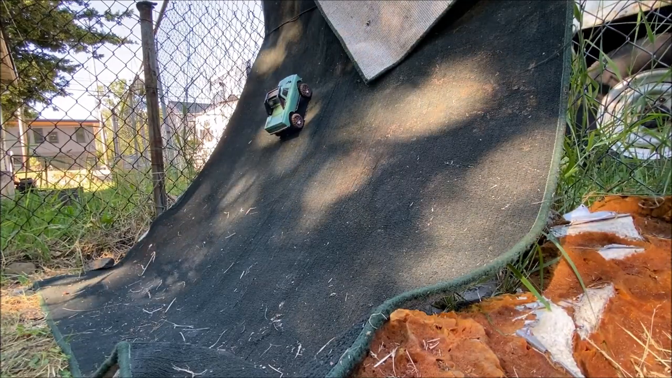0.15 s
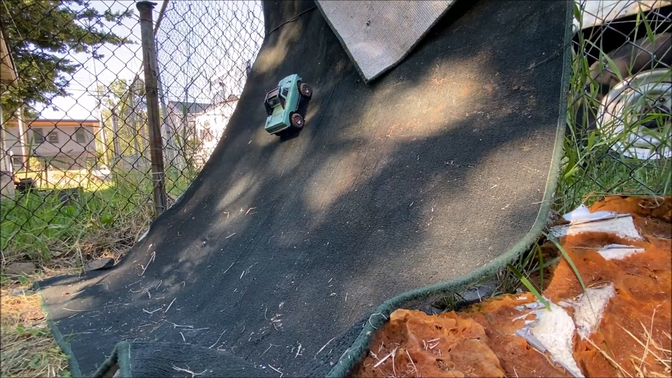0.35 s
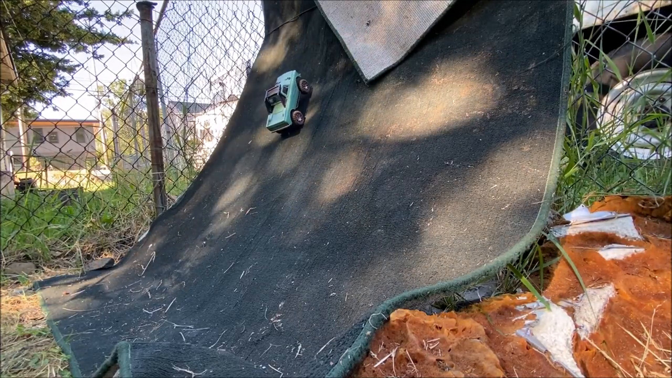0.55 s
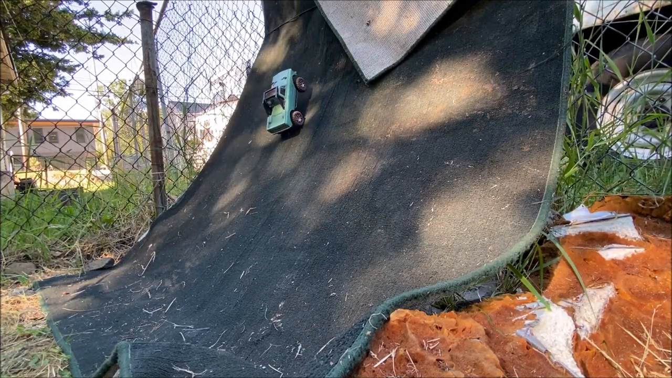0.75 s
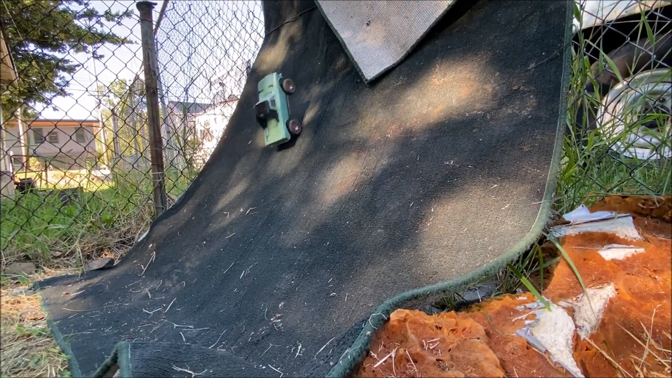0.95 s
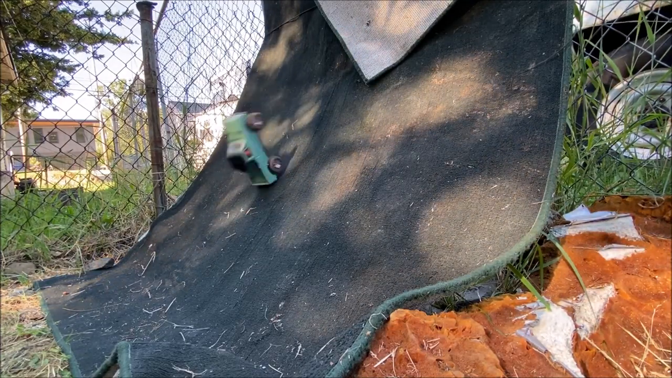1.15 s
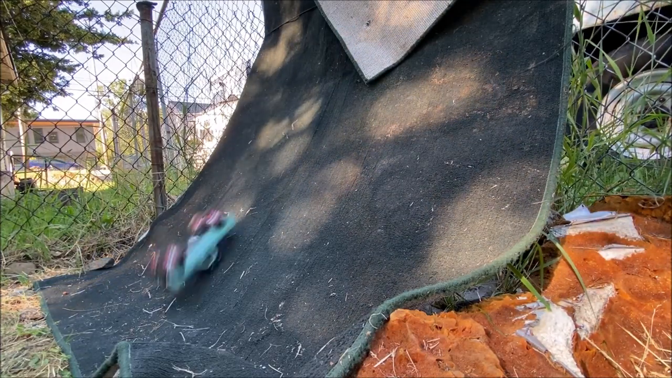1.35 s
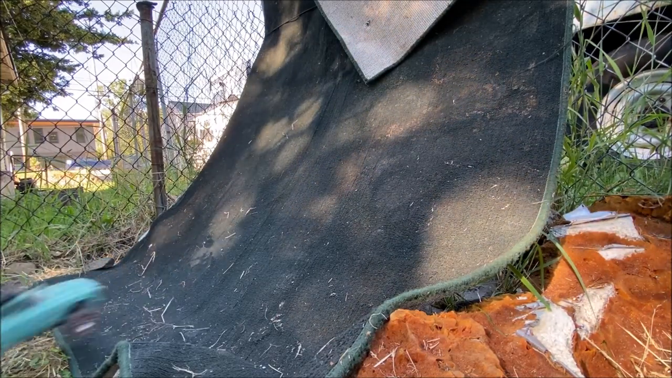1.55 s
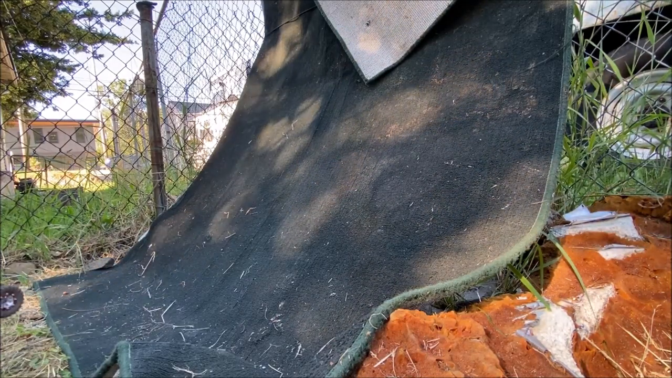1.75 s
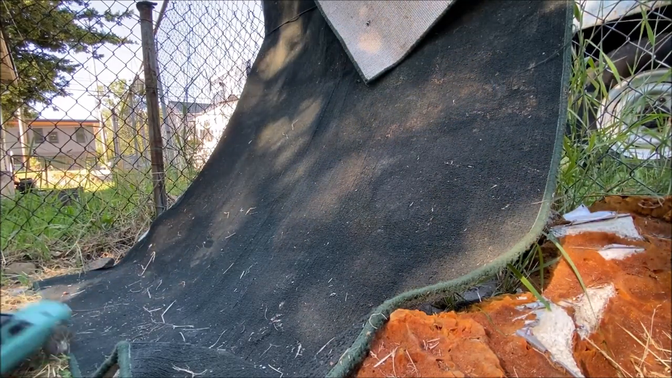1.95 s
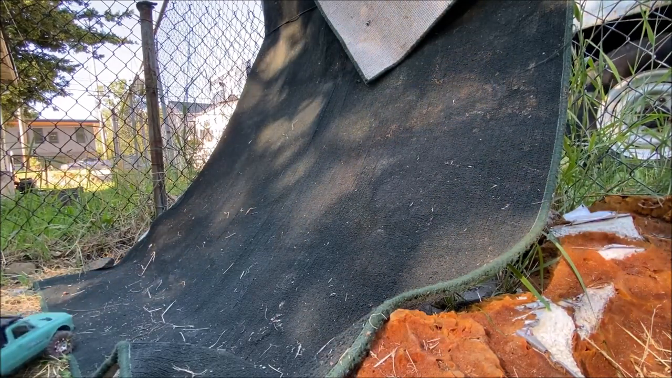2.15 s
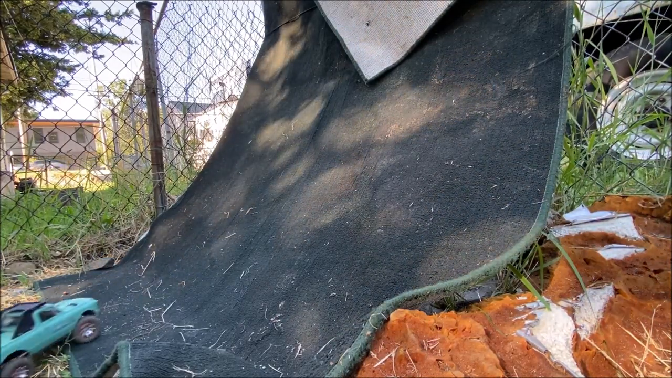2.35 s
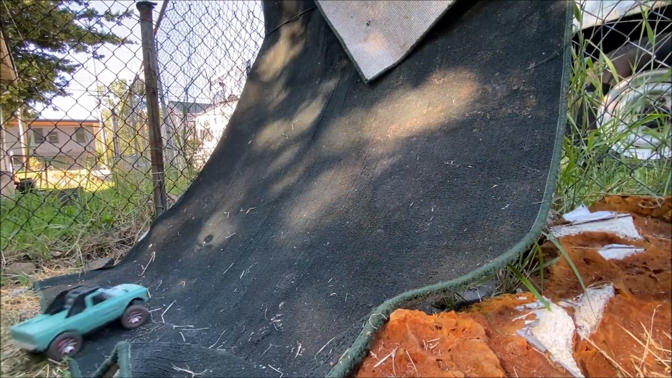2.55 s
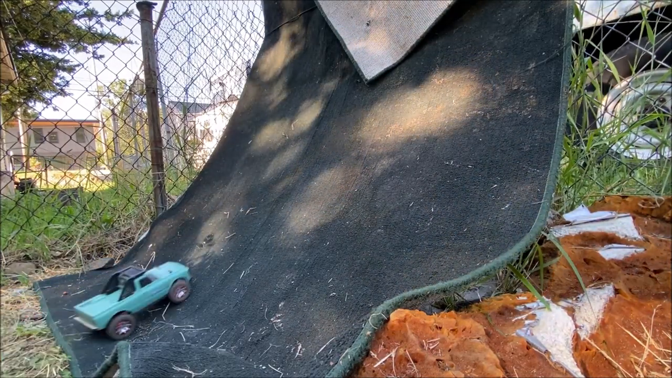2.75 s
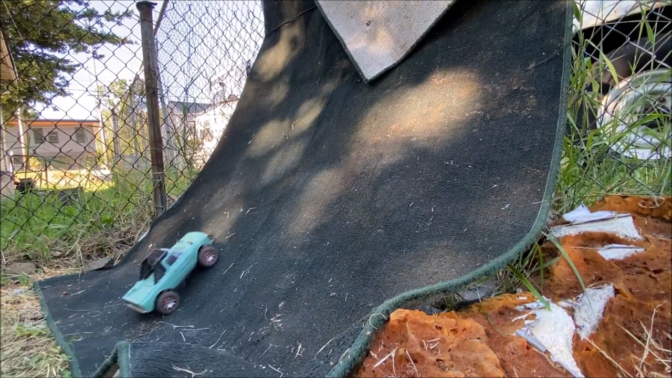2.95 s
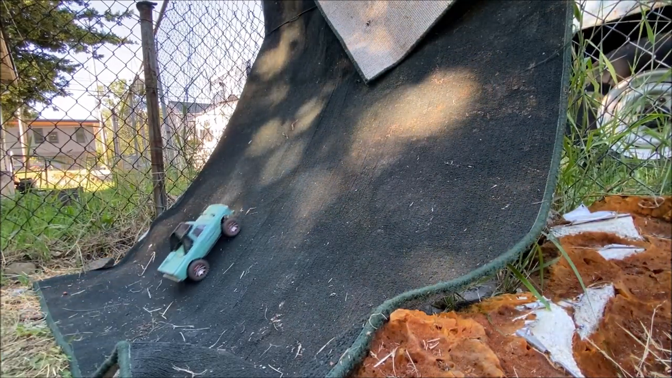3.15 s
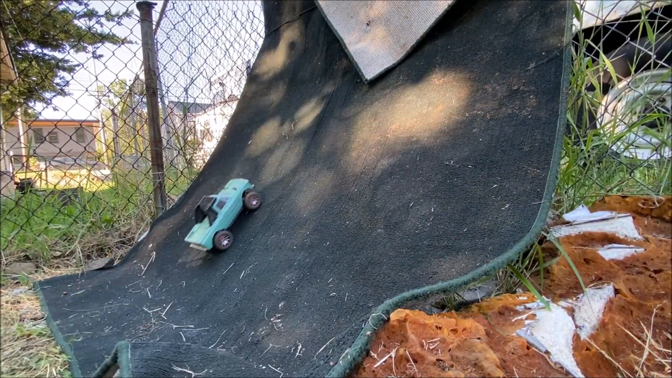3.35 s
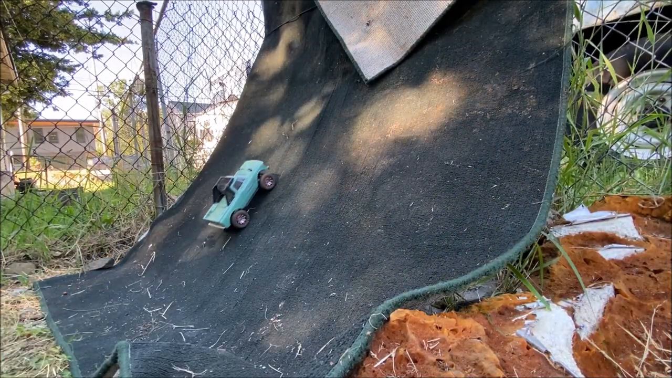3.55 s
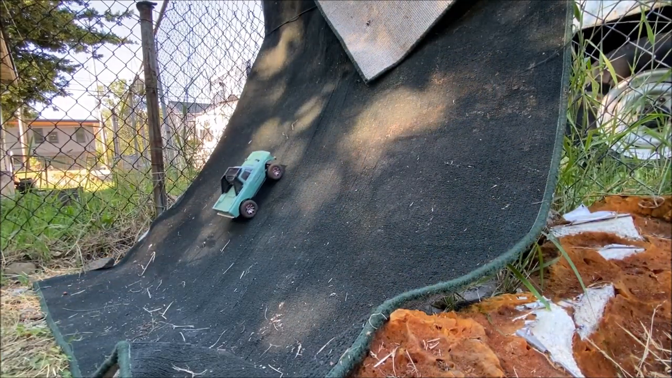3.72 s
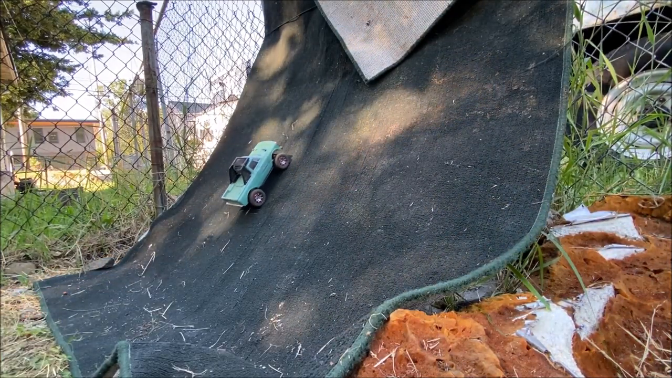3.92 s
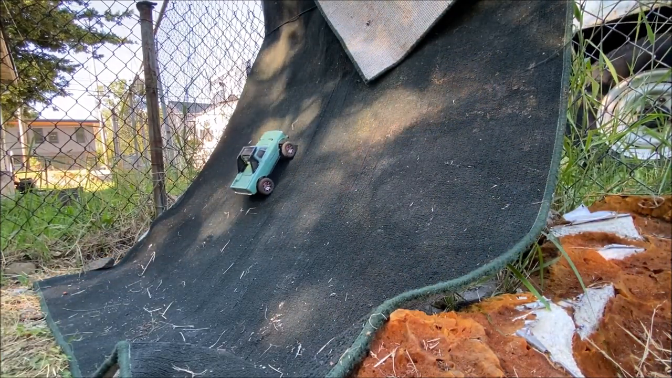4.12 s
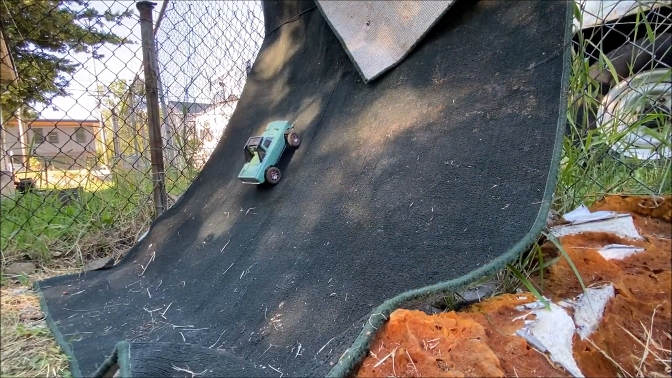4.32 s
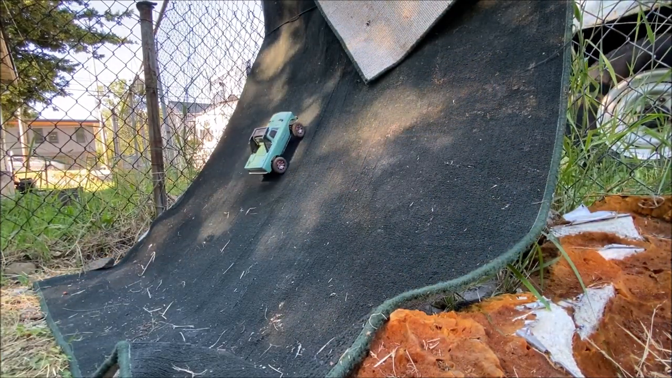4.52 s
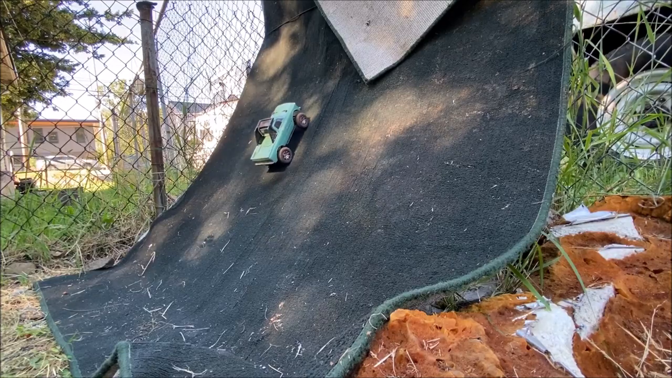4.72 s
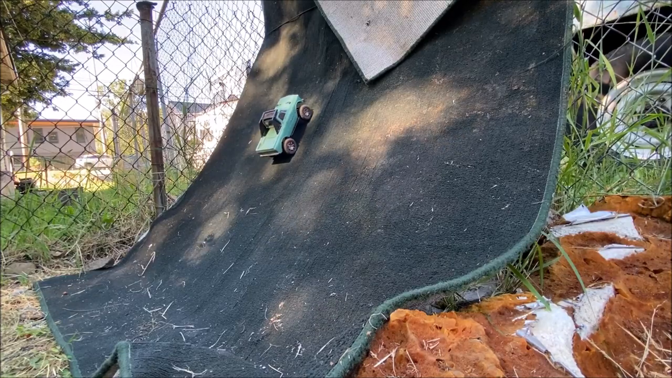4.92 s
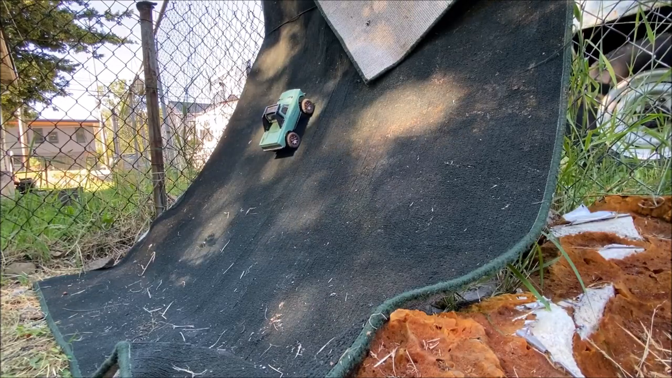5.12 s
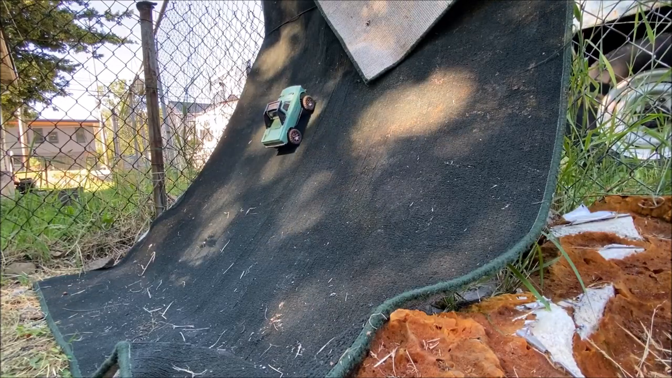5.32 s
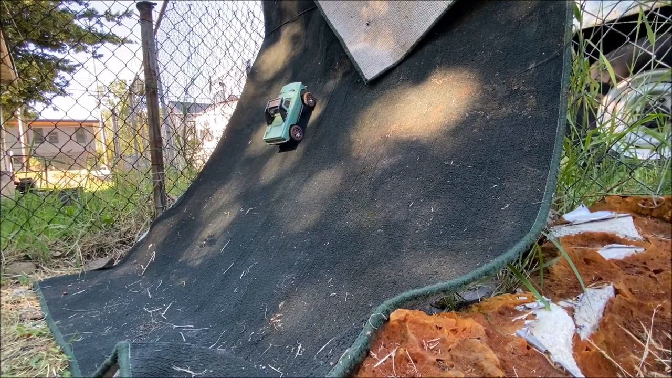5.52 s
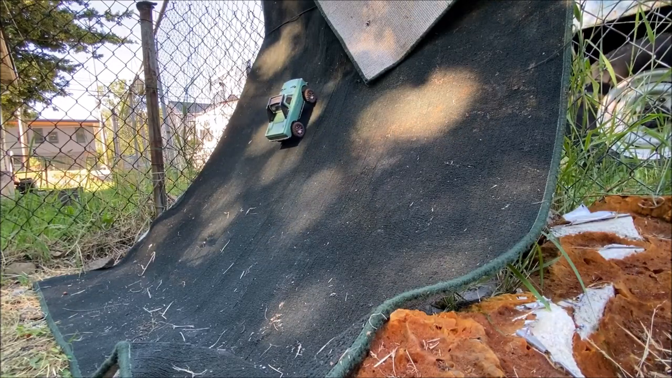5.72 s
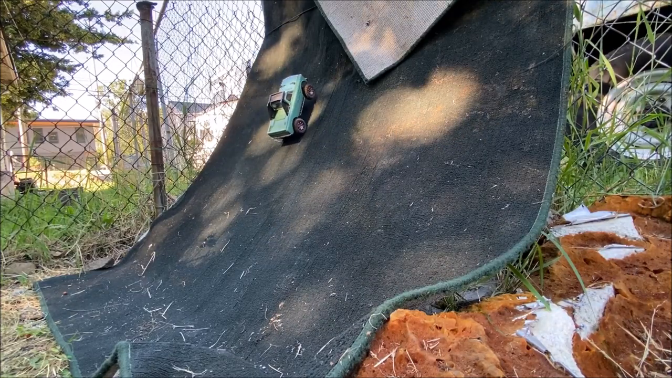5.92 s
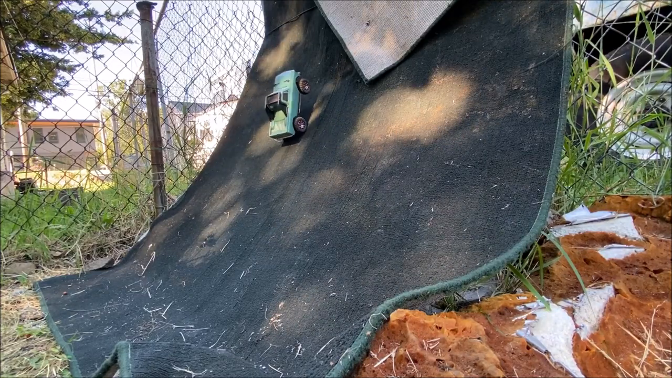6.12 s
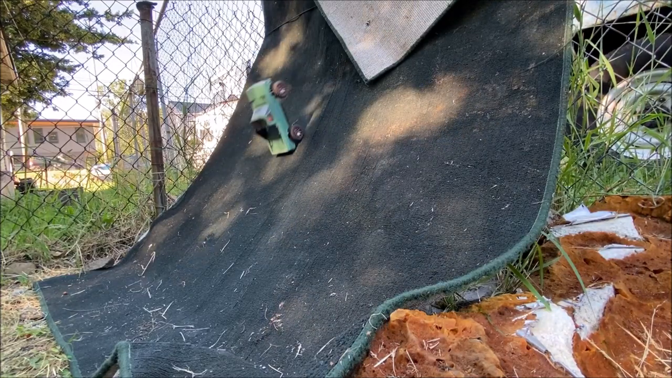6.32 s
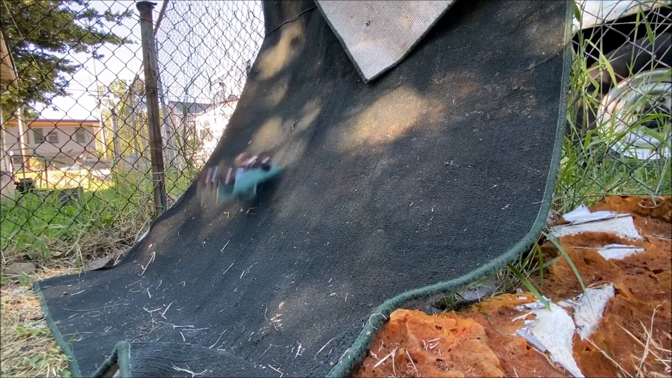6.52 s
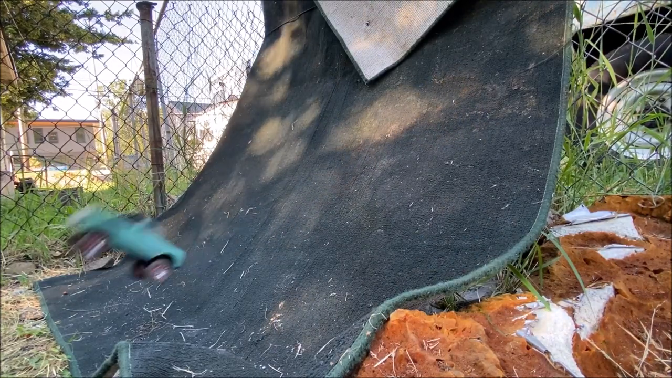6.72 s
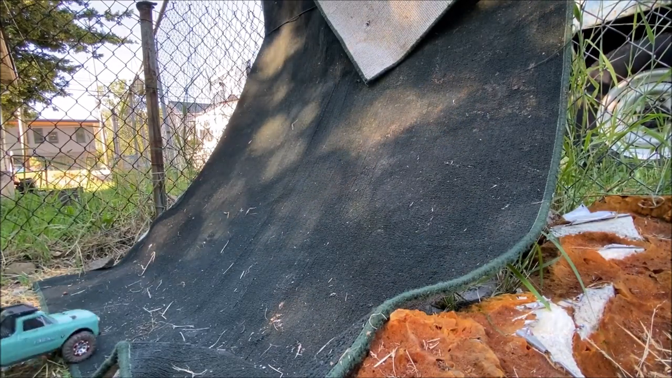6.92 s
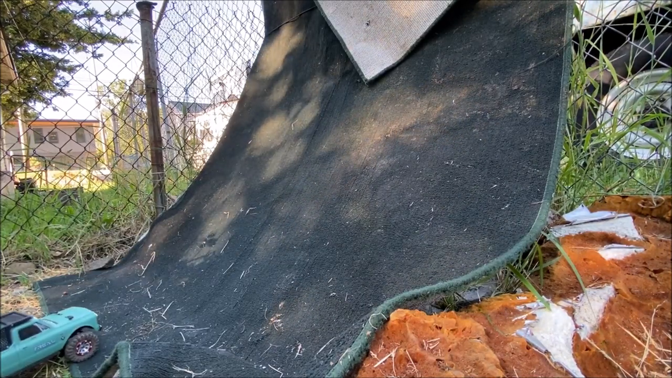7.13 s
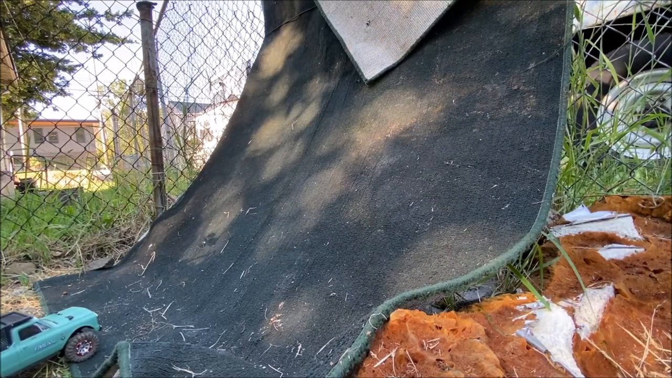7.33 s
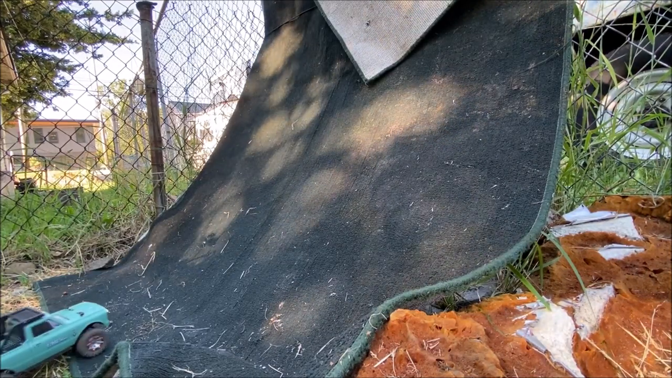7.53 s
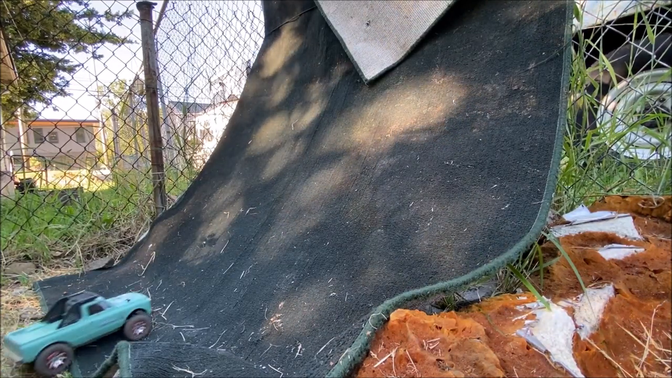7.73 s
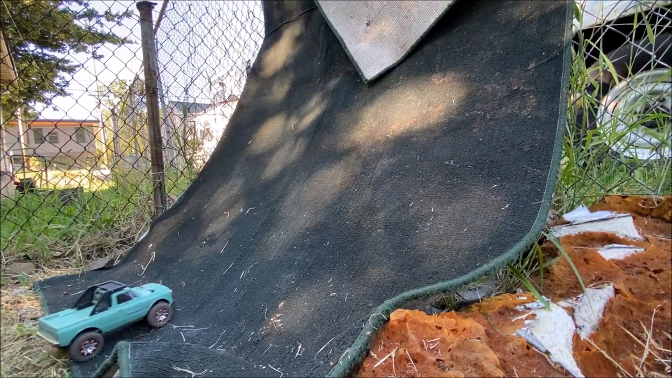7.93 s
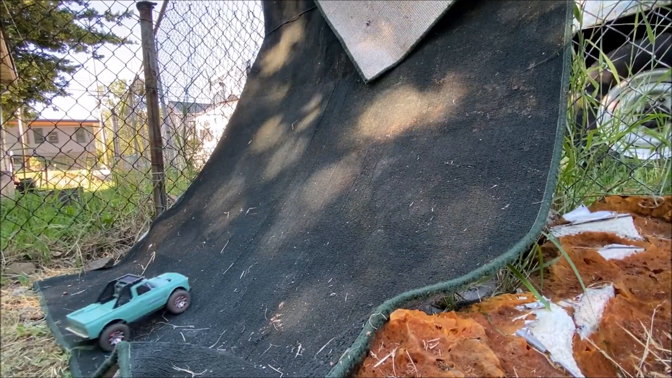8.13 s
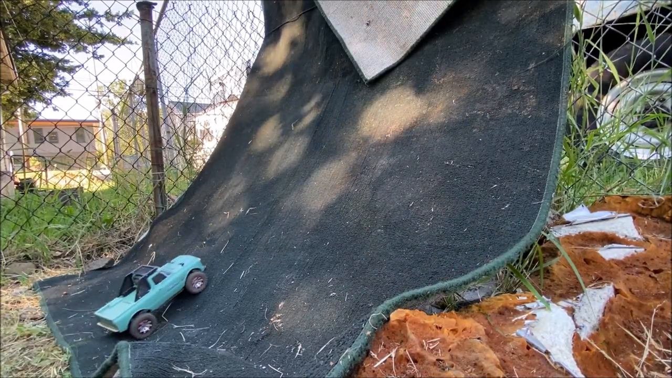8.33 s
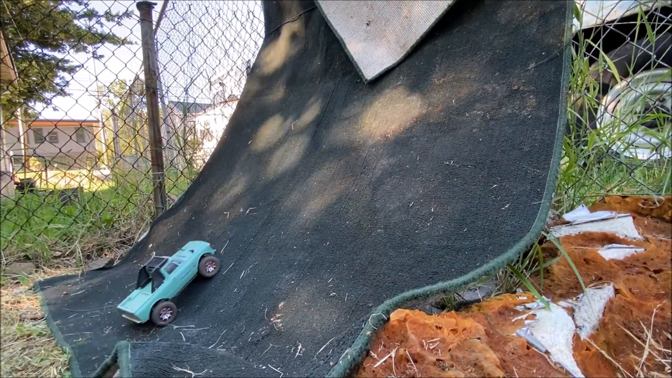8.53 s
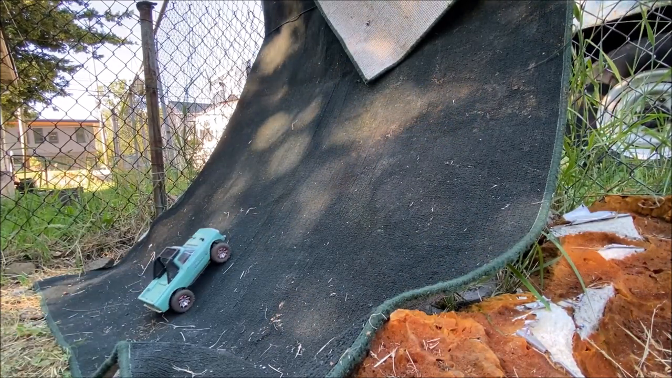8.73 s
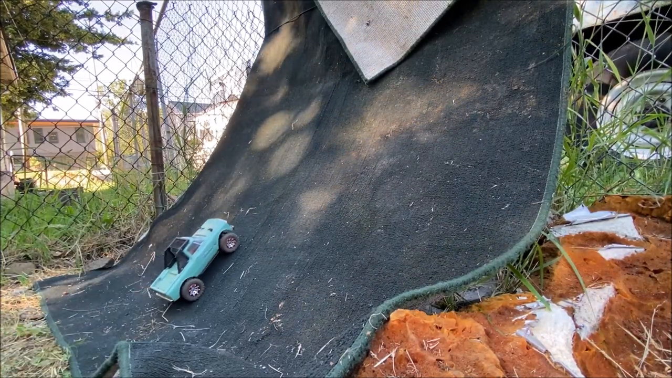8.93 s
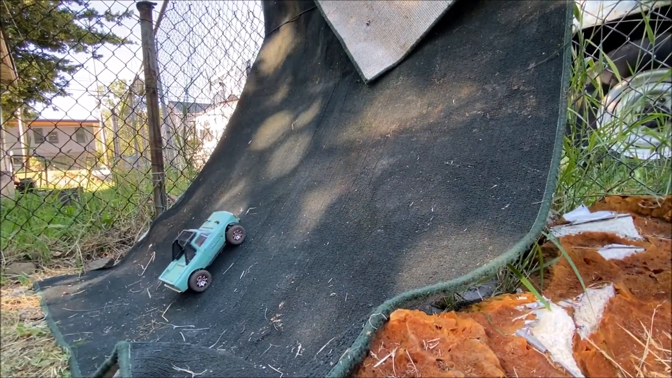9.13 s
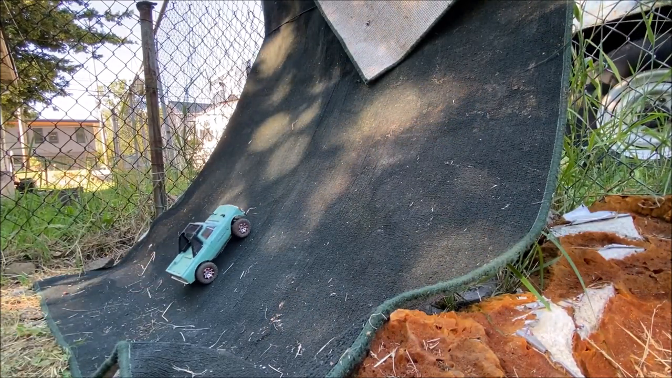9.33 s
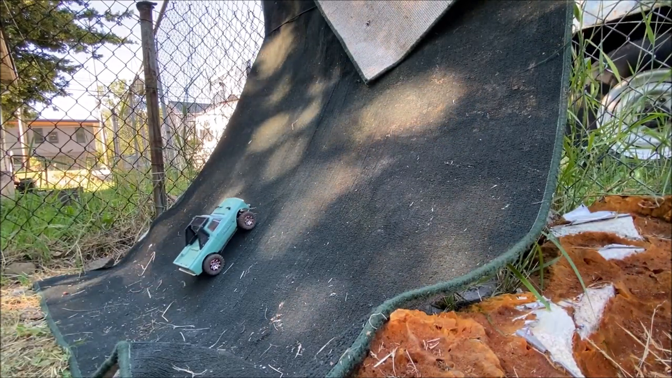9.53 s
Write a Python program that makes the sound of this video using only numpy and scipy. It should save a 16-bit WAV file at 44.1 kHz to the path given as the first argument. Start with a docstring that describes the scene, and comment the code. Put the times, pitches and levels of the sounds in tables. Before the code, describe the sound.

Soft distant traffic rumbles outdoors. A toy truck's tyres scuff, then it tumbles down a ramp in sharp plastic clacks and a short low boom. Its small geared motor spins up into a bright whine with gritty rattle, slows and fades on the climb. It falls again with hard cracks, then drives up once more. Close stereo phone microphones, truck mostly to the left.

```python
"""Distant traffic rumbles behind a garden; then a small electric toy truck squeals, scuffs and tumbles on its ramp.
Shell and wheels crack and chatter as noise bursts and ringing chassis modes; ramp modes boom on landing.
Its geared motor whines and rattles up the rubber-covered ramp, then it tumbles and climbs again:
tooth-mesh tones and a rasp repeating with the shaft follow the motor speed, with squeals as it labours.
Two spaced phone microphones hear the truck from the left."""
import sys
import numpy as np
from scipy import signal
from scipy.fft import rfft, irfft, next_fast_len
from scipy.io import wavfile

SR = 44100
rng = np.random.default_rng(int(sys.argv[2]) if len(sys.argv) > 2 else 0)


def dump(signal):
    """Clip the signal to [-1, 1] and save it as 16-bit WAV at the path in sys.argv[1]."""
    limited = np.clip(np.atleast_2d(signal).T, -1, 1)
    pcm = np.round(limited * 32767).astype(np.int16)
    wavfile.write(sys.argv[1], SR, pcm)


N = 422037
T = np.arange(N) / SR
SIZE = 2 * next_fast_len(N // 2 + 4096)  # padded transform length, samples
FREQ = np.fft.rfftfreq(SIZE, 1 / SR)


def undb(db):
    """Decibels to gain."""
    return 10 ** (np.asarray(db) / 20)


def unit(x):
    """Scale to rms 1."""
    return x / np.sqrt(np.mean(x ** 2))


def noise():
    """White noise."""
    return rng.standard_normal(N)


def curve(rows, axis=1):
    """One column of a timed table at every sample."""
    rows = np.array(rows)
    return np.interp(T, rows[:, 0], rows[:, axis])


def across(points):
    """Value at every transform frequency, joined on a log-frequency axis."""
    hz, value = np.transpose(points)
    return np.interp(np.log(FREQ + 1), np.log(np.abs(hz) + 1), value)


def shape(x, response):
    """Filter by a frequency response."""
    return irfft(rfft(x, SIZE) * response, SIZE)[:N]


def resonance(hz, width):
    """Response of one resonance, gain 1 at its centre."""
    return 1j * FREQ * width / (hz ** 2 - FREQ ** 2 + 1j * FREQ * width)


def body(peaks):
    """Joint gain of several resonances, their powers added."""
    power = sum(np.abs(undb(db) * resonance(hz, width)) ** 2 for hz, width, db in peaks)
    return np.sqrt(power)


def walk(rate):
    """Smooth random wander of rms 1, through two new random levels per cycle of rate [Hz]."""
    levels = rng.standard_normal(16384)
    place = T * rate * 2
    step = place.astype(int)
    blend = (1 - np.cos(np.pi * (place - step))) / 2
    here, following = levels[step % len(levels)], levels[(step + 1) % len(levels)]
    return unit(here * (1 - blend) + following * blend)


def spell(start, end, attack, t60, growth_db=0):
    """Envelope: attack ending at the start, drift by growth_db up to full level at the end, then a release."""
    onset = np.clip(1 + (T - start) / attack, 0, 1)
    to_go = np.clip((end - T) / (end - start), 0, 1)
    release_db = -60 * np.maximum(T - end, 0) / t60
    return onset * undb(-growth_db * to_go + release_db)


def ring(modes, length, scatter):
    """Decaying modes; each blow finds them with its own weights and slightly shifted."""
    hz, db, t60 = np.transpose(modes)[:, :, None]
    t = np.arange(length) / SR
    shift, weight = rng.standard_normal((2, len(modes), 1))
    # the lowest modes all move with the blow; higher ones radiate with either sign
    sign = np.where(hz < 300, 1, rng.choice([-1, 1], hz.shape))
    decay = undb(db + 2 * weight - 60 * t / t60)
    return np.sum(sign * decay * np.sin(2 * np.pi * hz * (1 + scatter * shift) * t), axis=0)


def add(track, s, sound):
    """Mix a sound in at time s."""
    start = int(s * SR)
    track[start:start + len(sound)] += sound[:N - start]


# receding traffic, before trims: (time [s], rumble level [dB], tyre wash level [dB])
TRAFFIC_LEVELS = [(0, -43, -48.5), (3, -43.5, -48), (6.5, -44.5, -49.5), (9.57, -47.5, -51)]
# tone of the low rumble: (frequency [Hz], relative level [dB])
RUMBLE_TONE = [(20, -41), (32, -19), (41, -14), (48, -5.5), (66, -5.5), (90, -4), (130, -3), (170, -4.5),
               (230, -7), (290, -12), (450, -22), (700, -22), (1200, -63), (2600, -100)]
# tone of the tyre wash: (frequency [Hz], relative level [dB])
WASH_TONE = [(200, -17), (370, -3.5), (460, -6), (600, -0.5), (780, -4.5), (1000, -2.5), (1280, -12),
             (1700, -17), (2150, -23), (2700, -22), (3300, -25.5), (4700, -31.5), (5800, -30),
             (7200, -37.5), (9500, -38.5), (16000, -55)]
# far engines, before trim: (start [s], end [s], mean pitch [Hz], level [dB])
ENGINE_NOTES = [(0, 12, 54.5, -47.5), (0, 0.46, 79.9, -45.5), (2.95, 3.64, 75, -41),
                (1.9, 2.75, 210.9, -46.5), (4.599, 5.45, 212.5, -46), (8.1, 9.35, 160.5, -44)]
ENGINE_FADE_S, ENGINE_T60_S = 0.18, 1.1


def traffic(rumble_db=1, wash_db=2, engine_db=-2, surge_db=1.13):
    """Far roads: low rumble, a wash of tyres and a few wavering engine notes."""
    rumble = unit(shape(noise(), undb(across(RUMBLE_TONE))))
    rumble = rumble * undb(curve(TRAFFIC_LEVELS) + rumble_db + surge_db * walk(3))
    wash = unit(shape(noise(), undb(across(WASH_TONE))))
    wash = wash * undb(curve(TRAFFIC_LEVELS, axis=2) + wash_db + .5 * walk(5.6))
    engines = 0
    for start, end, hz, db in ENGINE_NOTES:
        note = np.sin(2 * np.pi * np.cumsum(hz * (1 + .008 * walk(7))) / SR)
        level = undb(db + 2 * walk(5))
        engines = engines + level * spell(start, end, ENGINE_FADE_S, ENGINE_T60_S) * note
    return rumble + wash + undb(engine_db) * engines


# motor starting or labouring, before trim: (start [s], end [s], level [dB])
STRAIN_SPELLS = [(0.491, 0.594, -73), (2.318, 2.397, -53.5), (4.26, 4.92, -52.5), (4.982, 5.079, -67),
                 (5.15, 5.6, -73), (5.65, 6.05, -73), (7.532, 7.58, -61), (7.82, 7.888, -60),
                 (8.45, 8.822, -55.5)]
STRAIN_ATTACK_S, STRAIN_GROWTH_DB, STRAIN_T60_S = 0.083, 3, 0.42


def strain(db=-3.0):
    """A thin, rough squeal of narrow-band noise that grows through each spell of motor effort."""
    squeal = shape(noise(), resonance(10450, 950) ** 2)
    effort = sum(undb(level) * spell(start, end, STRAIN_ATTACK_S, STRAIN_T60_S, STRAIN_GROWTH_DB)
                 for start, end, level in STRAIN_SPELLS)
    return undb(db + walk(36)) * effort * unit(squeal)


def ramp_echoes(x):
    """The curved ramp mirrors the moving truck along three short, changing paths, so its colour swirls."""
    paths = [(.0007, .5), (.0016, .4), (.0031, .35)]  # (mean delay [s], gain)
    echoes = sum(gain * np.interp(T - delay - .00012 * walk(2), T, x) for delay, gain in paths)
    return (x + echoes) / np.sqrt(1 + sum(gain ** 2 for _, gain in paths))


# tyres sliding and wheels spinning freely, before trims: (start [s], end [s], level [dB])
SLIDE_SPELLS = [(1.0, 1.197, -61), (1.226, 1.512, -56), (2.134, 2.2, -60), (6.372, 6.57, -63)]
# tone of the tread: (frequency [Hz], relative level [dB])
TREAD_TONE = [(1180, -27), (2000, -19), (2260, 4), (3370, -10), (4730, -13), (5250, -13), (9250, -12.5),
              (10400, -2.5), (13100, -18.5), (16000, -12)]
# resonances of the scuffed shell: (frequency [Hz], width [Hz], relative level [dB])
SHELL_RESONANCES = [(2310, 210, -17), (3260, 250, -23), (3960, 250, -6), (4430, 280, 0), (7700, 240, 14),
                    (8100, 250, 6)]
SLIDE_ATTACK_S, SLIDE_GROWTH_DB, SLIDE_T60_S = .03, -0.5, 0.26


def slides(db=-1, shell_db=-5, grit_db=3.0):
    """Tread scuffs over the mat in dense little grains that ring the shell, easing slightly through a slide."""
    grains = noise() * undb(grit_db * walk(465))
    slip = sum(undb(level) * spell(start, end, SLIDE_ATTACK_S, SLIDE_T60_S, SLIDE_GROWTH_DB)
               for start, end, level in SLIDE_SPELLS)
    tread = unit(shape(grains, undb(across(TREAD_TONE))))
    shell = unit(shape(grains, body(SHELL_RESONANCES)))
    return slip * (undb(db) * tread + undb(shell_db) * shell)


# blows of shell and wheels, before trims:
# (time [s], crack level [dB], chassis knock level [dB], length of the chatter after it [s])
BLOWS = [(1.216, -51, -45, 0.0019), (1.4394, -26.5, -21, .015), (1.450, -37, -21.5, .02),
         (1.470, -35, -24.5, .03), (1.497, -38, -35.5, .025), (1.6796, -21.5, -15.5, .03),
         (1.838, -37.5, -34.5, .01), (1.875, -49, -57, 0.0026), (2.066, -29.5, -29, .008),
         (6.589, -46.5, -58, 0), (6.654, -34, -30, 0), (6.665, -27, -20, .01), (6.677, -22.5, -15, .022),
         (6.713, -35.5, -46, .015), (6.9162, -19.5, -15.5, .05), (7.001, -48, -51, 0),
         (7.073, -46.5, -53, 0)]
REBOUND_GAP_S, REBOUND_FADE_DB_PER_S = .006, 350  # mean gap; fade with time since the blow
REBOUND_CRACK_DB, REBOUND_KNOCK_DB = -4, -10  # relative to the blow, before the fade


def contacts(scatter_db=0.5, count=12):
    """Every blow, and loose parts rebounding after it at uneven gaps, fading: (s, crack dB, knock dB)."""
    for s, crack, knock, chatter in BLOWS:
        yield s, crack, knock
        delays = REBOUND_GAP_S * np.cumsum(rng.uniform(.5, 1.5, count))
        drops = scatter_db * rng.standard_normal(count) - REBOUND_FADE_DB_PER_S * delays
        for delay, drop in zip(delays, drops):
            if delay < chatter:
                yield s + delay, crack + REBOUND_CRACK_DB + drop, knock + REBOUND_KNOCK_DB + drop


# tone of a crack in the thin shell: (frequency [Hz], relative level [dB])
CRACK_TONE = [(500, -7), (1200, -2), (2000, -5.5), (3000, -6), (4200, -1.5), (5200, -8), (6400, -6.5),
              (8000, -7.5), (11000, -14.5), (13400, -22), (15800, -15)]
# chassis modes: (mean frequency [Hz], mean relative level [dB], 60 dB decay time [s])
CHASSIS_MODES = [(363, -2, 0.095), (400, 3, 0.028), (525.7, -2.5, 0.054), (599, -6, 0.17),
                 (726, 0.5, 0.058), (842, 0, 0.023), (1018, -9.5, 0.067), (1277, 0.5, 0.026),
                 (1620, 3.5, 0.026), (1795, -2, 0.032), (2380, -6.5, 0.027)]


def clatter(knock_db=-8, contact_s=.0008, crack_t60=0.028, tail_db=-24, tail_t60=0.23):
    """Each blow cracks in the thin shell, leaves loose parts buzzing and knocks the chassis."""
    cracks, knocks, t = np.zeros(N), np.zeros(N), T[:8192]
    snap = undb(-60 * t / crack_t60)
    buzz = undb(tail_db - 60 * t / tail_t60)
    fade = (snap + buzz) * np.minimum(t / contact_s, 1)
    for s, crack, knock in contacts():
        add(cracks, s, undb(crack) * fade * rng.standard_normal(len(t)))
        add(knocks, s, undb(knock) * ring(CHASSIS_MODES, len(t), scatter=0.036))
    return shape(cracks, unit(undb(across(CRACK_TONE)))) + undb(knock_db) * knocks


# landings on the ramp: (time [s], level [dB])
LANDINGS = [(1.448, -19), (1.535, -27.5), (6.678, -17)]
# ramp modes: (mean frequency [Hz], mean relative level [dB], 60 dB decay time [s])
RAMP_MODES = [(51, -13, 0.34), (88, -21, 0.99), (105.3, -1.5, 0.18), (139, -27, 0.49), (179, -25.5, 0.13),
              (257, -32, 0.031)]


def thuds():
    """The ramp booms briefly as its modes ring under a landing truck."""
    out = np.zeros(N)
    for s, db in LANDINGS:
        add(out, s, undb(db) * ring(RAMP_MODES, SR // 2, scatter=0.015))
    return out


def falls():
    """The truck tumbling on the ramp; the thin sheet radiates no deep bass."""
    return shape(clatter() + thuds(), 1 / (1 + (42 / (FREQ + 1)) ** 6))


# gearbox loudness, one table per climb, before trims: (time [s], level [dB])
DRIVE_LEVELS = [
    [(2.22, -73), (2.4, -58), (2.57, -61.5), (2.62, -55), (2.67, -60), (2.7, -58.5), (3.42, -52.5),
     (3.81, -61.5), (4.13, -63), (4.95, -65), (5.25, -78)],
    [(7.46, -78), (7.56, -62.5), (7.72, -59.5), (7.91, -63), (8.08, -60.5), (8.13, -62), (8.66, -58.5),
     (9.09, -65), (9.1, -66), (9.4, -66), (9.57, -65)],
]


def drive_gain():
    """Gearbox gain through both climbs, fading to silence over 20 ms outside each."""
    gain = 0
    for climb in DRIVE_LEVELS:
        inside = np.minimum(T - climb[0][0], climb[-1][0] - T)
        gain = gain + undb(curve(climb)) * np.clip(1 + inside / .02, 0, 1)
    return gain


# motor speed, one table per climb: (time [s], mean tooth mesh rate [Hz])
MOTOR_SPEED = [
    [(2.28, 1925), (2.33, 2266), (2.39, 3120), (2.48, 3712), (2.58, 4100), (2.62, 3830), (2.85, 4824),
     (3.14, 4370), (3.38, 4293), (3.56, 3232), (3.71, 2005), (3.93, 1824), (4.12, 2057), (4.37, 1799),
     (4.38, 1960), (4.47, 1784), (4.76, 1860), (4.91, 1730), (5.04, 1350), (5.15, 1392)],
    [(7.53, 1317), (7.62, 2720), (7.69, 3160), (7.84, 2852), (7.9, 1740), (8.01, 1407), (8.19, 2373),
     (8.26, 2568), (8.59, 2000), (8.68, 2175), (8.8, 1840), (8.97, 1195), (9.04, 1261), (9.13, 1013),
     (9.46, 1003), (9.57, 1232)],
]


def mesh_rate():
    """Teeth meshing per second through both climbs, before the unsteadiness."""
    return curve(np.vstack(MOTOR_SPEED))


TEETH = 12  # on the pinion


def shaft_angle():
    """Turning of the motor [radians]; the slower it runs, the more the uneven load shakes its speed."""
    mesh = mesh_rate()
    unsteady = (.013 * walk(20) + .015 * walk(130)) * 2000 / mesh
    return 2 * np.pi * np.cumsum(mesh * (1 + unsteady)) / SR / TEETH


# first three partials of the tooth mesh: (relative level [dB])
MESH_PARTIALS = [0, -1.5, -7]
# lowest mesh tone as the truck turns towards and away: (time [s], relative level [dB])
FACING = [(3.05, -1), (3.3, 3), (3.6, -6), (3.85, 2), (7.8, 4), (8.0, -6), (8.26, 1), (8.5, -10)]
# how strongly the housing radiates a tooth tone of each pitch: (frequency [Hz], gain [dB])
RADIATION = [(1100, -9), (1650, -5), (1920, 5), (2200, -3), (2500, -1), (2750, -6), (3150, 1), (3500, -2),
             (4250, 6), (5000, 2), (5700, -4), (6700, -7), (8700, -1), (9700, -9)]
# weaker gear tones, among them the idler's and the pinion's sidebands:
# (multiple of the shaft rate, relative level [dB])
WEAK_TONES = [(5.5, -3), (7, -14), (11, -7), (11.5, -5), (16, -6), (17.5, -9), (19, -5), (20, -8), (23, -6),
              (25, -10), (33, -3), (36, 1)]
# gearbox resonances: (frequency [Hz], width [Hz], relative level [dB])
GEARBOX_RESONANCES = [(2050, 500, -6), (3300, 350, -6), (4300, 600, 0), (5150, 400, -2), (6200, 500, -7),
                      (8000, 700, -7), (8750, 450, -7), (11100, 1200, -6)]
COGGING = .15  # how much harder the off-centre pinion bites once a turn (0-1)


def whine(shaft, mesh_db=0.5, others_db=-6, flutter_db=2.5):
    """Teeth mesh twelve a turn; their tones and weaker, rougher ones flare as they cross the resonances."""
    tones = []
    for k, db in enumerate(MESH_PARTIALS, 1):
        level = undb(db + flutter_db * walk(40))
        tones.append(level * np.sin(k * TEETH * shaft + .25 * k * walk(110)))
    mesh = undb(curve(FACING)) * tones[0] + sum(tones[1:])
    mesh = mesh * (1 + COGGING * np.cos(shaft))
    others = sum(undb(db + 3 * walk(11)) * np.sin(k * shaft + k / 30 * walk(130)) for k, db in WEAK_TONES)
    mesh = undb(mesh_db) * shape(mesh, undb(across(RADIATION)))
    others = undb(others_db) * shape(others, body(GEARBOX_RESONANCES))
    return drive_gain() * (mesh + others)


# tone of the rasp, before the treble lift: (frequency [Hz], relative level [dB per Hz])
RASP_TONE = [(1200, -34), (2200, -8), (3400, -11), (4400, -6), (5400, -15), (6400, -8), (8400, 1),
             (9400, -13.5), (11100, 0.5), (12400, -7), (13400, -5), (14500, -2.5), (15800, -10)]
# narrow rings of the gear housing: (frequency [Hz], width [Hz], relative level [dB])
HOUSING_RINGS = [(3950, 140, -7), (5030, 160, -1), (6300, 220, -7), (7250, 200, -8), (8100, 220, -3),
                 (8800, 200, -1), (10900, 500, -5)]


def rattle(shaft, db=4.0, housing_db=-8.5, bright_db=8.0):
    """Worn teeth rasp in a pattern repeating each turn, over chatter ringing the housing; speed brightens it."""
    flaws = rng.standard_normal(128)
    turn = shaft / (2 * np.pi) % 1
    worn = np.interp(turn, np.linspace(0, 1, len(flaws)), flaws)
    contact = (1 + .5 * np.cos(shaft)) * (noise() + 1.1 * worn)
    rasp = unit(shape(contact, undb(across(RASP_TONE))))
    treble = shape(rasp, 1 / (1 + (10500 / (FREQ + 1)) ** 8))
    lift = undb(bright_db * np.log2(mesh_rate() / 3300))  # bright_db per octave of speed
    rasp = rasp + treble * (lift - 1)
    housing = unit(shape(contact, body(HOUSING_RINGS)))
    return drive_gain() * (undb(db) * rasp + undb(housing_db) * housing)


def gears():
    """The gearbox: a focused whine, and a broad rasp that also glances off the ramp."""
    shaft = shaft_angle()
    return whine(shaft) + ramp_echoes(rattle(shaft))


def truck():
    """Motor squeal, scuffing tyres and gears."""
    return strain() + ramp_echoes(slides()) + gears()


def ports(source, phase, balance, diffuse_db):
    """Two spaced microphones: direct sound is offset in phase; scattered sound differs above the bass."""
    direct = rfft(source(), SIZE)
    # a second, independent draw of the source, opposite in sign at the two microphones
    scattered = rfft(source(), SIZE) * undb(diffuse_db) * FREQ / np.hypot(FREQ, 330)
    lean = undb(across(balance) / 2)
    left = (direct + scattered) * lean
    right = (direct - scattered) / lean * np.exp(-1j * across(phase))
    return irfft([left, right], SIZE)[:, :N]


# phase between the microphones: (frequency [Hz], lead of the left [radians])
FAR_PHASE = [(20, 0), (130, .15), (290, .9), (520, 2.2), (1380, 3.6), (2300, 6.2), (3450, 9.1), (5510, 15),
             (8270, 22.3), (16000, 24)]
BLOW_PHASE = [(20, -1.5), (150, 0.5), (600, 2.3), (1300, 0.5), (1700, 3.5), (2410, 5), (4570, 10),
              (8350, 16), (16000, 21.5)]
GEAR_PHASE = [(20, 0), (520, 1.5), (1290, 3.2), (1900, 4.9), (3000, 5.2), (4390, 5.6), (5200, 7),
              (5860, 10.1), (6370, 12), (8270, 16.5), (9730, 20), (10500, 24), (11500, 25.5), (15100, 31.6)]
# balance between the microphones: (frequency [Hz], left minus right [dB])
FAR_BALANCE = [(60, 1), (200, 0), (380, 1), (700, 4.5), (1290, 2), (4400, 2.5), (8120, .5), (15000, -1)]
BLOW_BALANCE = [(60, 2), (200, .5), (380, 2), (700, 6.5), (1290, 3.5), (4400, 4.5), (8120, 3), (15000, 0)]
GEAR_BALANCE = [(700, 4.5), (2380, 1.5), (4400, 6), (8120, .5), (15000, -.5)]


def scene():
    """Garden and truck at the two microphones."""
    garden = ports(traffic, FAR_PHASE, FAR_BALANCE, diffuse_db=-5)
    drive = ports(truck, GEAR_PHASE, GEAR_BALANCE, diffuse_db=-10)
    tumble = ports(falls, BLOW_PHASE, BLOW_BALANCE, diffuse_db=-8)
    return garden + drive + tumble


def record(dry):
    """The phone cuts the top steeply above 15.9 kHz."""
    low_pass = signal.ellip(10, .2, 80, 15900, fs=SR, output="sos")
    return signal.sosfilt(low_pass, dry)


dry = scene()
out = record(dry)
dump(out)
```